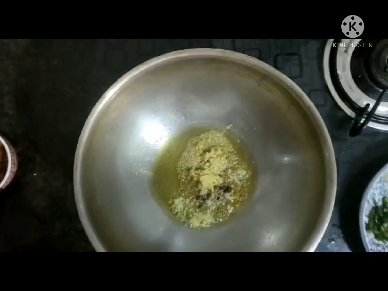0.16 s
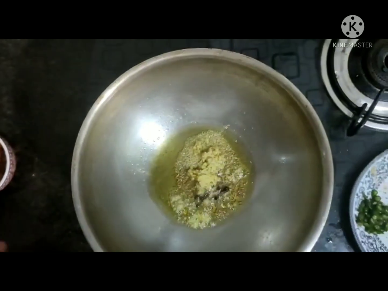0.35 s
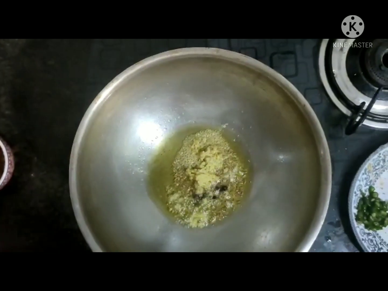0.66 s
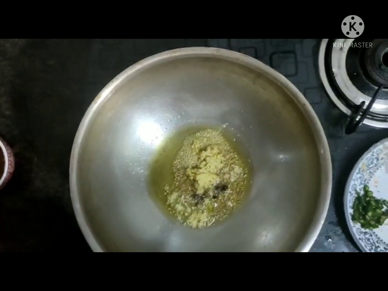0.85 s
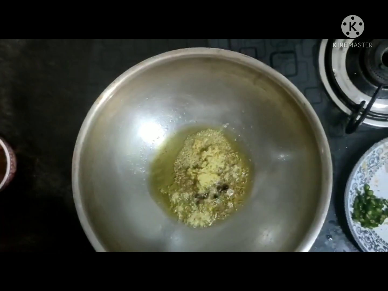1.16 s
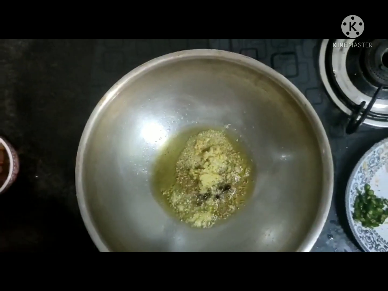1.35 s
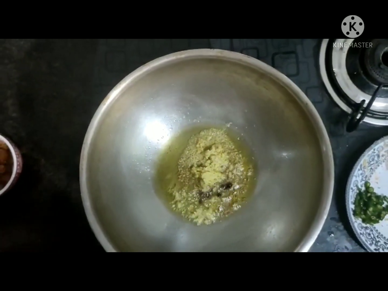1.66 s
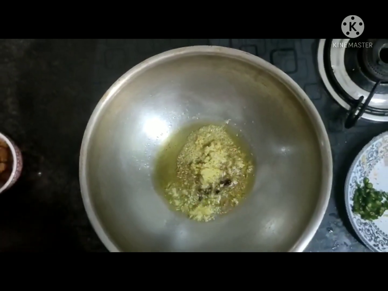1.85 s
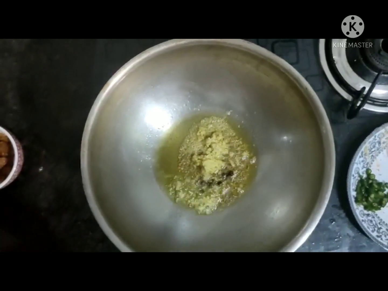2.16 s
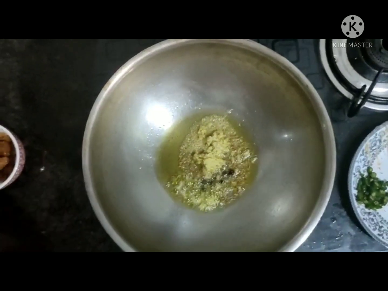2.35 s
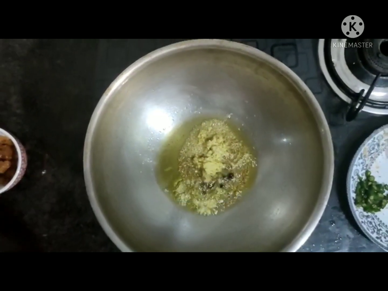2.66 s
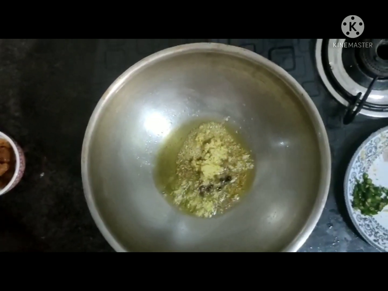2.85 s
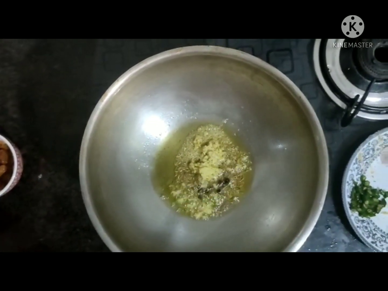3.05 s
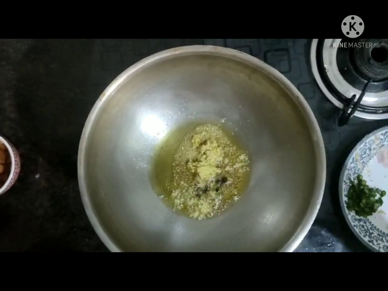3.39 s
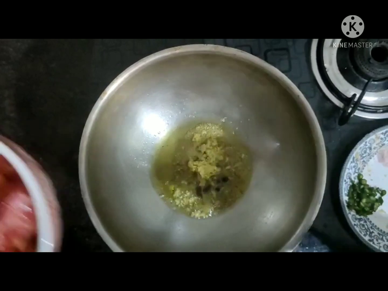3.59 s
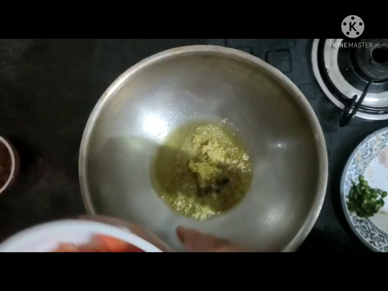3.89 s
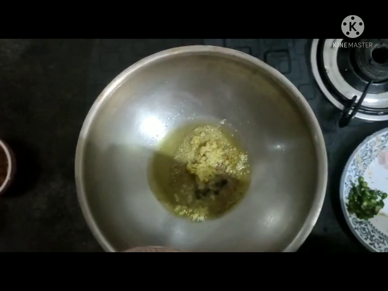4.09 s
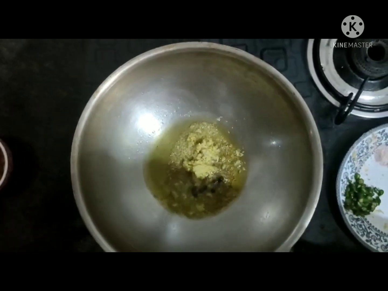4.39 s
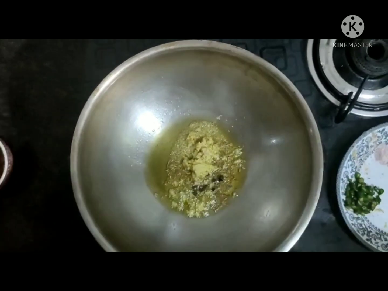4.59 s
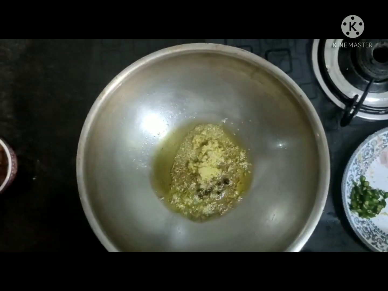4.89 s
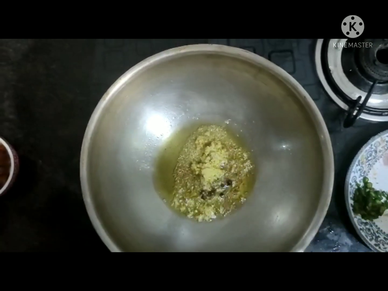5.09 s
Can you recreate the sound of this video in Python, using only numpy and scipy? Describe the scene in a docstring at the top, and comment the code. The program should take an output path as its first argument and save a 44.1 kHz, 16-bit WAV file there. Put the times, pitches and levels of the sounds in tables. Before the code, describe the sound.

Ginger and spices fry in a little oil in a steel pan, heard very close in stereo. Lively fizz and crackle start strong, with many sharp pops. A metal vessel is set down with a rocking knock at half a second. A big snap comes near two seconds, then a dish clinks at two and a half. The sizzle thins afterwards over a faint gas flame in a hard, small kitchen.

```python
"""Ginger frying in a steel pan

Spices and grated ginger fry in a little hot oil, just under a two-port microphone, over a soft gas flame.
Random trains of tiny filtered steam bursts make the sizzle, which mostly calms as the ginger dries.
Louder pops, snaps, spits and squeaks stand out and ring the pan. Beside the stove a metal vessel is
set down with a knock and later a dish clinks: both are decaying modes plus filtered noise.
Each gets room reverberation; the microphone adds port resonances, soft overload and gain control."""
import sys
import numpy as np
from scipy import signal
from scipy.fft import rfft, irfft
from scipy.io import wavfile

SR = 44100
rng = np.random.default_rng(int(sys.argv[2]) if len(sys.argv) > 2 else 0)


def transcribe(u):
    """Save the signal u as a 16-bit wav file named by the first command-line argument.

    u: samples, shape (n,) or (channels, n), limited to [-1, 1]; the rate is SR.
    q: integer samples, one column per channel.
    """
    v = np.clip(np.atleast_2d(u).T, -1, 1)
    q = np.round(v * 32767).astype(np.int16)
    wavfile.write(sys.argv[1], SR, q)


N = 230904

# likeness of scattered sound at the two ports: f/Hz, likeness/0-1
LIKENESS = [(300, 0.93), (850, 0.6), (1600, 0.51), (2800, 0.06), (16000, 0)]
# decay of bounces inside the pan's bowl: f/Hz, t60/s
BOWL = [(1000, 0.022), (4500, 0.018), (7000, 0.036), (10000, 0.016), (15000, 0.014)]


def gain_of(db):
    """Decibels to amplitude."""
    return 10 ** (np.asarray(db) / 20)


def evened(x):
    """Scales to rms 1."""
    return x / np.sqrt(np.mean(x ** 2) + 1e-20)


def read(points, hz):
    """Interpolates a table on a log-frequency axis."""
    f, value = np.transpose(points)
    return np.interp(np.log(hz + 1), np.log(f + 1), value)


def add(mix, s, sound):
    """Adds a sound into the mix at time s, in place."""
    part = mix[..., max(round(s * SR), 0):][..., :sound.shape[-1]]
    part += sound[..., :part.shape[-1]]


def through(x, response):
    """Convolves each channel, keeping at most the scene's length."""
    return signal.fftconvolve(np.atleast_2d(x), np.atleast_2d(response), axes=1)[:, :N]


def colour(points, size=1024):
    """Minimum-phase click with the given spectrum."""
    hz = abs(np.fft.fftfreq(size, 1 / SR))
    log_gain = np.log(gain_of(read(points, hz)))
    spectrum = np.exp(np.conj(signal.hilbert(log_gain)))
    return np.fft.ifft(spectrum).real[:size // 2]


def drift(low_cut_hz, high_cut_hz):
    """Random swells of rms 1: noise with gentle, overlapping low and high cuts."""
    hz = np.fft.rfftfreq(N, 1 / SR)
    low_cut = hz ** 2 / (hz ** 2 + low_cut_hz ** 2)
    high_cut = 1 / np.sqrt(1 + (hz / high_cut_hz) ** 4)
    return evened(irfft(rfft(rng.standard_normal(N)) * low_cut * high_cut, N))


def scatter(t60, size=8192):
    """Dense reflections at both ports, left energy 1: noise decaying by a table of f/Hz, t60/s."""
    hz, t, z = signal.stft(rng.standard_normal((2, size)), SR, nperseg=128)
    same = np.clip(read(LIKENESS, hz), -1, 1)[:, None]
    z[1] = same * z[0] + np.sqrt(1 - same ** 2) * z[1]
    t60_s = np.maximum(read(t60, hz), .003)[:, None]
    z *= 1000. ** (-t / t60_s)
    tail = signal.istft(z, SR, nperseg=128)[1][:, :size]
    return tail / np.linalg.norm(tail[0])


def ring(modes, size=16384):
    """Decaying sine modes, left energy 1; dB weighs a mode's energy. High modes reach the ports out of step."""
    t, out = np.arange(size) / SR, np.zeros((2, size))
    right_only = np.array([[0], [1]])
    for hz, db, t60 in modes:
        skew = (1 - read(LIKENESS, hz)) * rng.uniform(-np.pi, np.pi) * right_only
        decay = 1000. ** (-t / t60)
        out += gain_of(db) / np.sqrt(t60) * decay * np.sin(2 * np.pi * hz * t + skew)
    return out / np.linalg.norm(out[0])


def bowl(bounce_db, bounce_t60, size=4096):
    """Path from one spot in the oil to the ports: direct click plus bounces inside the steel bowl."""
    path = gain_of(bounce_db) * scatter(bounce_t60, size=size)
    path[0, 8] += 1  # sample 8; the right port hears it 5-8 samples earlier
    path[1, rng.integers(0, 4)] += 1
    return path / np.sqrt(1 + gain_of(bounce_db) ** 2)


def flurries(decay_s, per_s=150):
    """One burst sets off its neighbours: activity leaps up and dies away. Mean 0, rms 1."""
    kicks = rng.random(N) * (rng.random(N) < per_s / SR)
    decay = np.exp(-1 / (decay_s * SR))
    activity = np.sqrt(signal.lfilter([1], [1, -decay], kicks))
    return evened(activity - activity.mean())


def bubbles(spectrum, strength, per_s, spread_db, cap, clump_db, clump_s, tint_db, count=16):
    """Steam bursts of very uneven size come in flurries, from `count` spots that each have their own tint."""
    size_db = spread_db * np.minimum(rng.exponential(1, N), cap) + clump_db * flurries(clump_s)
    sign = rng.choice([-1, 1], N)
    happens = rng.random(N) < per_s / SR
    bursts = strength * evened(gain_of(size_db) * sign * happens)
    hz, db = np.transpose(spectrum)
    tints = gain_of(tint_db * rng.standard_normal((count, len(hz))))
    # together the spots keep the spectrum
    tints_db = 20 * np.log10(tints / np.sqrt(np.mean(tints ** 2, 0)))
    spot, out = rng.integers(0, count, N), np.zeros((2, N))
    for k in range(count):
        tinted = colour(np.c_[hz, db + tints_db[k]])
        path = through(tinted, bowl(bounce_db=1.0, bounce_t60=[(1000, 0.016)]))
        out += through(bursts * (spot == k), path)
    return out


def boil_db(s):
    """How hard water boils out of the ginger at time s."""
    # boil strength: t/s, level/dB
    boil_points = [(0, 0), (1.2, -2), (1.95, -1.85), (2.4, -4.5), (3.3, -5), (3.9, -7), (4.45, -7),
                   (4.8, -9), (5.24, -6)]
    return np.interp(s, *np.transpose(boil_points))


def sizzle():
    """Fine fizz from wet ginger over duller sputter of larger bubbles; both follow the surging boil."""
    # bubble spectra: f/Hz, level/dB
    fine_spectrum = [(300, -12.5), (2000, -4), (4500, 4.5), (6800, -2.5), (8500, -1), (11000, -3.5),
                     (13000, 2.5), (15500, -10)]
    coarse_spectrum = [(300, 6.5), (400, 1.5), (550, -0.5), (780, 6.5), (1400, -1.5), (2400, 2),
                       (4000, -0.5), (6000, 0), (15000, 2)]
    fizz_db, sputter_db, sputter_follows = -34.5, -38, 0.9  # last: share of the boil's dB
    surge_rms_db = 1.34
    boil = boil_db(np.arange(N) / SR) + surge_rms_db * drift(low_cut_hz=7, high_cut_hz=3)
    fizz = gain_of(fizz_db + boil)
    sputter = gain_of(sputter_db + sputter_follows * boil)
    fine = bubbles(fine_spectrum, fizz, per_s=5000, spread_db=4.7, cap=3.5,
                   clump_db=1.8, clump_s=0.007, tint_db=4)
    coarse = bubbles(coarse_spectrum, sputter, per_s=900, spread_db=4.4, cap=4.0,
                     clump_db=1.2, clump_s=0.01, tint_db=3)
    return fine + coarse


def spits():
    """Wet clumps spit short flurries of throaty bubbles."""
    # spits: t/s, length/s, relative level/dB
    spit_events = [(0.902, 0.032, -35), (1.024, 0.02, -35), (1.278, 0.01, -35), (1.435, 0.0037, -32.5),
                   (5.122, 0.0066, -30)]
    # spectrum: f/Hz, level/dB
    spit_spectrum = [(300, -31), (550, -30), (780, 12), (1100, -2.5), (1600, 1), (2400, 4), (4000, -16.5),
                     (7000, -23.5), (15000, -22)]
    strength = np.zeros(N)
    for s, length_s, db in spit_events:
        add(strength, s, gain_of(db) * signal.windows.tukey(round(length_s * SR), .4))
    spitting = bubbles(spit_spectrum, strength, per_s=5000, spread_db=3.5, cap=1.6,
                       clump_db=2, clump_s=0.003, tint_db=3, count=6)
    return gain_of(6.0) * spitting


def burst(length_s, size=512):
    """A film of oil tears in a quick flutter, not one clean step; decaying noise with its spectrum flattened."""
    tear = rng.standard_normal(size) * np.exp(-np.arange(size) / (length_s * SR))
    spectrum = rfft(tear, 2 * size)
    flutter = np.roll(irfft(spectrum / abs(spectrum)), 8)[:size]
    return flutter / np.linalg.norm(flutter)


def small_pops(count=80):
    """Lesser pops at random moments, in the columns of pops(); they weaken as the boil calms."""
    per_s = 5
    # relative level, bass lift, treble lift
    middle_db, spread_db = (-18, 1, -1), (2, 6, 5)
    times = np.cumsum(rng.exponential(1 / per_s, count))
    chance = rng.uniform(-1, 1, (count, 3))
    db, bass_db, treble_db = (middle_db + chance * spread_db).T
    return np.c_[times, db + boil_db(times), bass_db, treble_db]


def pops():
    """Drops of water flash to steam: dry cracks, or narrow pips where bass and treble are weak."""
    # placed pops: t/s, relative level/dB, bass lift/dB, treble lift/dB
    pop_events = [(0.0863, -27, -1, -4), (0.198, -21, -4, 18.5), (0.393, -8.5, 12, -16),
                  (0.459, -2, -27, -10), (0.6692, -3, 5, -5), (0.7219, -13, -16, -22),
                  (0.7493, -17, -15, -18), (0.89, -21.5, 15, -6), (0.9229, -6.5, 0, 0),
                  (1.0406, -2.5, -1, -13), (1.1474, -7, 2, -23), (1.1673, -23, 15, 17),
                  (1.3146, -16.5, 8, 11.5), (1.4205, -7, -5, -10), (1.5699, 1.5, -19, -16),
                  (1.5964, -3.5, -2, -17), (1.6175, -7, -6, -9), (1.6367, -11.5, 8.5, 14.5),
                  (1.6503, -2, 0, 1), (1.741, -17, 3, -5), (1.8188, -9, -21, -3), (1.9597, -4.5, -4, 1.5),
                  (1.981, -4.5, -16, -17), (2.068, -26, 11, -6), (2.2234, -16.5, -10, 9),
                  (2.5558, -9, 0, -10), (2.6844, -11, -6, 4), (2.786, -16.5, 9.5, 4),
                  (2.8475, -16.5, 11.5, 5), (2.899, -11.5, 6, -22), (2.9378, -13.5, 10, -31),
                  (3.097, -18, 1, 8), (3.1373, -12, -7, 10), (3.3399, -10, -2.5, 4), (3.349, -18, -7, 13),
                  (3.4621, -26, -17, 14), (3.506, -17.5, 8, 13.5), (3.5855, -10, -1, 1),
                  (3.755, -21.5, 15.5, 16), (3.9146, -12, 2, 2), (4.2015, -9, -13, -14),
                  (4.2071, -8, 3, -14), (4.3636, -10, -12, -16), (4.4213, -7, -46, -10),
                  (4.4344, -6, -15, -6), (4.4798, -24, -6, 6), (4.51, -26, 11, -7), (4.523, -11, 6.5, 3),
                  (4.5796, -18, 6, 1), (4.7001, -15.5, 7.5, -7), (4.7392, -32, 14, 22),
                  (4.7728, -23, 6, 14), (4.7892, -15, 11, -13), (4.7931, -20.5, 10, -7),
                  (4.886, -22.5, 14.5, -3), (4.8944, -14.5, 8, 5), (4.9958, -8, -14, -6),
                  (5.0336, -27, 2, 17), (5.061, -25, 2, 8), (5.2052, -25.5, 15, 12)]
    out = np.zeros((2, N))
    for s, db, bass_db, treble_db in [*pop_events, *small_pops()]:
        low = [(300, bass_db - 3), (620, bass_db - 3.5), (2200, bass_db - 3), (3800, 1.8 * bass_db - 9)]
        high = [(6800, 0), (10500, treble_db), (15000, treble_db - 4)]
        crack = through(colour(low + high), burst(length_s=0.0002))
        add(out, s, gain_of(db) * through(crack, bowl(bounce_db=-5.5, bounce_t60=BOWL)))
    return gain_of(2.0) * out


def snaps():
    """A big drop bursts almost in one step of pressure, straight to the ports and once more off the far wall."""
    # snaps: t/s, level/dB, bass lift/dB
    snap_events = [(2.0972, 5.5, -2.5), (2.4554, -1, -5.5)]
    # spectrum: f/Hz, level/dB
    snap_spectrum = [(300, 6), (550, 9), (850, 8.5), (1800, 8), (3000, 1), (5000, 2), (7000, -4), (9500, 5),
                     (12500, -2.5), (15500, -10)]
    wall_s, wall_db = 0.0012, -14
    out = np.zeros((2, N))
    hz, shape_db = np.transpose(snap_spectrum)
    bass_share = read([(1500, 1), (7000, 0)], hz)
    for s, db, bass_db in snap_events:
        spectrum = np.c_[hz, db + shape_db + bass_db * bass_share]
        step = through(colour(spectrum), burst(length_s=0.00008))
        for delay_s, echo_db in [(0, 0), (wall_s, wall_db)]:
            path = bowl(bounce_db=-5.5, bounce_t60=BOWL)
            add(out, s + delay_s, gain_of(echo_db) * through(step, path))
    return out


def squeaks(width_hz=600):
    """Steam squeaks out from under a shred of ginger: brief, rough whistles of narrow-band noise."""
    # squeaks: t/s, length/s, f/Hz, level/dB
    squeak_events = [(1.74, 0.0081, 6850, -36), (4.196, 0.012, 6200, -35), (4.983, 0.01, 6400, -41.5)]
    out = np.zeros((2, N))
    for s, length_s, hz, db in squeak_events:
        count = round(length_s * SR)
        peak = signal.iirpeak(hz, hz / width_hz, fs=SR)
        whistle = evened(signal.lfilter(*peak, rng.standard_normal(1024))[:count])
        shaped = whistle * signal.windows.tukey(count, .3)
        add(out, s, gain_of(db) * through(shaped, bowl(bounce_db=0.0, bounce_t60=BOWL)))
    return out


def struck(blows, modes, clatter, clatter_t60, ring_db, right_lag_s, spot_db=2.5, pivot_hz=1300):
    """Each blow sets off a short clatter and the object's modes, mixed by its hardness and its random spot."""
    out, t = np.zeros((2, N)), np.arange(N) / SR
    mode_hz, mode_db, t60 = np.transpose(modes)
    clatter_hz, clatter_db = np.transpose(clatter)
    for s, db, hardness in blows:
        tilt_db = hardness * np.log2(mode_hz / pivot_hz)
        shares_db = mode_db + tilt_db + spot_db * rng.standard_normal(len(modes))
        strength = np.linalg.norm(gain_of(shares_db)) / np.linalg.norm(gain_of(mode_db))
        add(out, s, gain_of(db + ring_db) * strength * ring(np.c_[mode_hz, shares_db, t60]))
        tick = colour(np.c_[clatter_hz, clatter_db + hardness * np.log2(clatter_hz / pivot_hz)])
        add(out, s, gain_of(db) * through(tick, scatter([(1000, clatter_t60)])))
    return np.array([out[0], np.interp(t - right_lag_s, t, out[1])])


def pan(frying):
    """The steel pan rings along with the frying, and the snaps jolt it."""
    # modes: f/Hz, relative level/dB, t60/s
    pan_modes = [(412, -29, 1), (617, 5, 0.068), (763, 2, 0.63), (1059, -2.5, 0.15), (1273, 3.5, 0.45),
                 (1495, 2, 0.079), (2230, 0, 0.26)]
    # jolts: t/s, relative level/dB, hardness/(dB/octave)
    pan_blows = [(2.0975, -4.5, 2.5), (2.456, -21, 6)]
    # clatter spectrum: f/Hz, relative level/dB
    pan_clatter = [(300, 14), (750, 5), (1500, 3), (2500, 2), (4000, 3), (15000, -14)]
    frying = frying + gain_of(-21.0) * through(frying, ring(pan_modes))
    return frying + struck(pan_blows, pan_modes, pan_clatter, clatter_t60=0.05, ring_db=-9.0, right_lag_s=0)


def vessel():
    """A metal vessel lands and rocks: a row of blows on its modes, with dense clatter between them."""
    # blows: t/s, relative level/dB, hardness/(dB/octave)
    vessel_blows = [(.5095, 5.5, 0.5), (.5125, -0.5, 4), (.5205, -0.5, -1), (.529, -3, 1), (.540, 1, 2),
                    (.583, -5.5, -0.5), (.597, -6.5, 2.5), (.615, -4.5, 4), (.662, -20, 3)]
    # modes: f/Hz, relative level/dB, t60/s
    vessel_modes = [(269.4, 0, 0.2), (405.6, 22.5, 0.22), (432, 15.5, 0.32), (560, 15, 0.11),
                    (736, 4.5, 0.67), (1010, 2, 0.18), (1088, 1.5, 0.17), (1268, 4.5, 0.19),
                    (1330, -1, 0.2), (1362, 5.5, 0.19), (1628, -3, 0.54), (1810, 0, 0.58),
                    (2148, 3.5, 0.16), (2290, -18, 0.3), (2320, 0.5, 0.46), (3200, -3, 0.25),
                    (3386, -12, 0.13)]
    # clatter spectrum: f/Hz, relative level/dB
    vessel_clatter = [(280, 22), (500, 5.5), (800, 6.5), (1050, 8), (1400, 7), (1800, 4), (2200, 3),
                      (2750, 0), (3350, 5.5), (3750, -1), (4200, -10), (6000, -10), (15000, -51)]
    return gain_of(3.5) * struck(vessel_blows, vessel_modes, vessel_clatter,
                                 clatter_t60=0.12, ring_db=3.0, right_lag_s=0.0001)


def dish():
    """A dish clinks, rim first and then its body: quick blows on its modes, with clatter."""
    # blows: t/s, relative level/dB, hardness/(dB/octave)
    dish_blows = [(2.493, 3, 1.5), (2.4962, -4.5, -1.5), (2.504, 1, -0.5), (2.513, -2.5, -2.5),
                  (2.528, -7, -0.5), (2.552, -16, -5)]
    # modes: f/Hz, relative level/dB, t60/s
    dish_modes = [(313, -4, 0.32), (389, 8.5, 0.3), (520, -8, 0.13), (618, 8.5, 0.064), (749, 5, 0.08),
                  (796, 4, 0.11), (1140, 1, 0.059), (1420, -9, 0.16), (1570, -10, 0.32), (2007, -2, 0.1),
                  (2140, -0.5, 0.22), (2474, 0.5, 0.072), (2830, -2, 0.078), (3780, 5.5, 0.1),
                  (3800, 4, 0.06)]
    # clatter spectrum: f/Hz, relative level/dB
    dish_clatter = [(280, 8.5), (700, 3.5), (1100, 0), (1500, -1), (2000, -2), (2600, -0.5), (3300, -13),
                    (3850, 2), (5000, -26), (15000, -42)]
    return gain_of(1.0) * struck(dish_blows, dish_modes, dish_clatter,
                                 clatter_t60=0.08, ring_db=-7.5, right_lag_s=0)


def bumps(low_hz=70, high_hz=170):
    """Short dull swells of band-passed rumble, the same at both ports."""
    # bumps: t/s, length/s, level/dB
    bump_events = [(0.0, 0.11, -52.5), (0.485, 0.064, -59), (0.566, 0.08, -67)]
    swell = np.zeros(N)
    band = signal.butter(3, [low_hz, high_hz], "bandpass", fs=SR, output="sos")
    rumble = evened(signal.sosfilt(band, rng.standard_normal(N)))
    for s, length_s, db in bump_events:
        add(swell, s, gain_of(db) * signal.windows.tukey(round(length_s * SR), .8))
    return swell * rumble


def flame():
    """Steady rush of the gas flame: smooth low noise, scattered by the pan above it."""
    # spectrum: f/Hz, relative level/dB
    flame_spectrum = [(260, 4), (340, 1.5), (480, 2.5), (650, -0.5), (1000, -22), (3000, -20), (15000, -47)]
    level_db = -51.5
    rush = through(rng.standard_normal(N), colour(flame_spectrum))
    return gain_of(level_db) * evened(through(rush, scatter([(1000, 0.031)])))


def kitchen(x, wet_db):
    """Adds the tiled room's reverberation, fed from the left port."""
    # reverberation: f/Hz, t60/s
    room_t60 = [(300, 0.37), (800, 0.65), (1400, 0.79), (2200, 0.7), (4500, 0.48), (8000, 0.56),
                (15000, 0.14)]
    return x + gain_of(wet_db) * through(x[0], scatter(room_t60, size=32768))


def duck(x, threshold_db=-29, share=0.55, recover_db_per_s=50):
    """Gain control: turns down a share of any smoothed level over the threshold, then recovers steadily."""
    keep = np.exp(-1 / (.05 * SR))  # 50 ms power average
    power = signal.lfilter([1 - keep], [1, -keep], (x ** 2).mean(0))
    power_db = 10 * np.log10(power + 1e-12)
    fall_db = recover_db_per_s * np.arange(N) / SR
    held_db = np.maximum.accumulate(power_db + fall_db) - fall_db
    over_db = np.maximum(held_db - threshold_db, 0)
    ease = np.exp(-1 / (.005 * SR))  # 5 ms gain smoothing
    return x * gain_of(-share * signal.lfilter([1 - ease], [1, -ease], over_db))


def scene():
    """Pan, vessel and dish, each with its own share of room, over the flame."""
    frying = pan(sizzle() + spits() + pops() + snaps() + squeaks())
    knock, clink = vessel(), dish()
    return kitchen(frying, wet_db=-7.5) + kitchen(knock, wet_db=-9.5) + kitchen(clink, wet_db=-3.0) + flame()


def record(dry):
    """Port resonances, soft overload, steep low cut, a few low bumps, gain control and band limit."""
    # cavity resonances of each port: f/Hz, level/dB
    left_port = [(300, -9.5), (1500, 2), (2200, 0.5), (4200, -3.5), (5100, -4.5), (5950, 0), (6400, 9.5),
                 (6950, 15), (7500, 10), (8100, 4), (9200, 1.5), (11200, 5), (13400, -2), (15200, 11)]
    right_port = [(300, -9), (1200, -2), (1700, 1), (1950, 2), (2190, 5.5), (2500, 2), (3700, -1.5),
                  (5100, -4), (6300, -2.5), (8500, -4), (10500, -4.5), (12500, -10.5), (15200, -1.5)]
    overload = 0.75  # amplitude ceiling; peaks near it are rounded off
    low_cut_hz, edge_hz = 275, 15700
    ports = np.array([colour(left_port), colour(right_port)])
    heard = overload * np.tanh(through(dry, ports) / overload)
    low_cut = signal.butter(16, low_cut_hz, "highpass", fs=SR, output="sos")
    heard = duck(signal.sosfilt(low_cut, heard) + bumps())
    band_limit = signal.firwin(601, edge_hz, window=("kaiser", 9), fs=SR)
    return signal.oaconvolve(heard, band_limit[None], "same")


dry = scene()
out = record(dry)
transcribe(out)
```